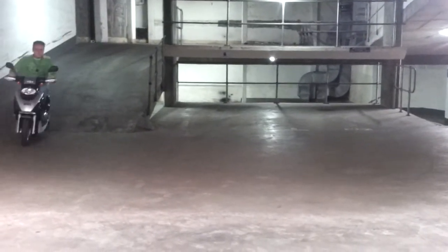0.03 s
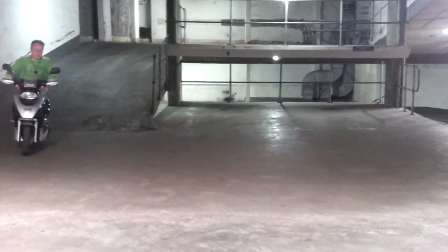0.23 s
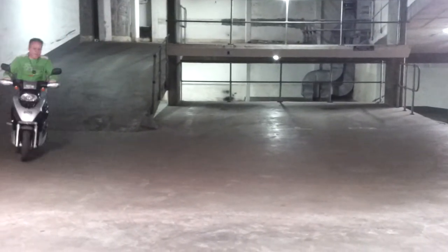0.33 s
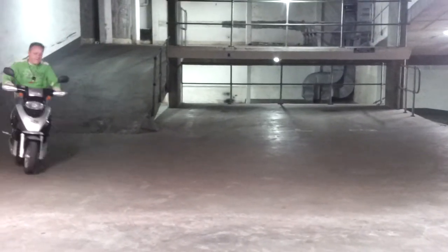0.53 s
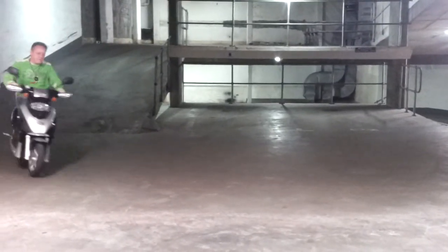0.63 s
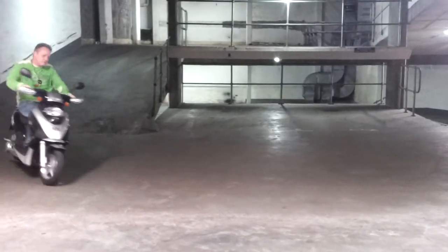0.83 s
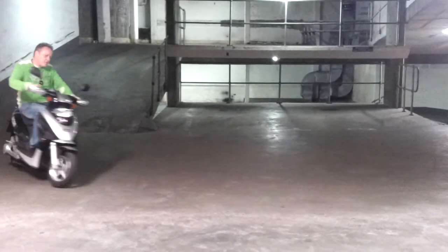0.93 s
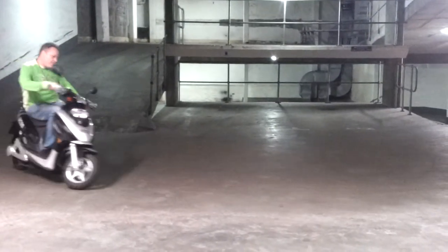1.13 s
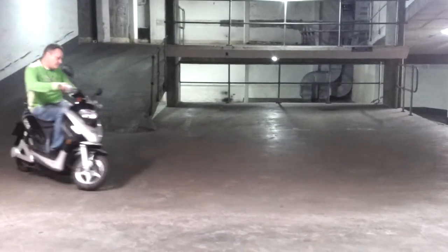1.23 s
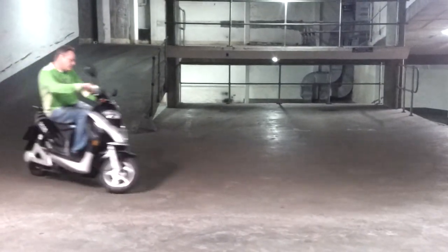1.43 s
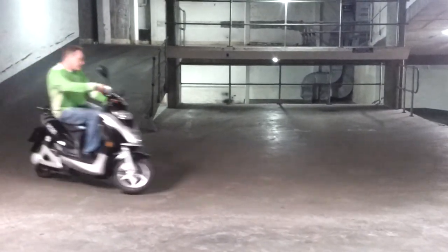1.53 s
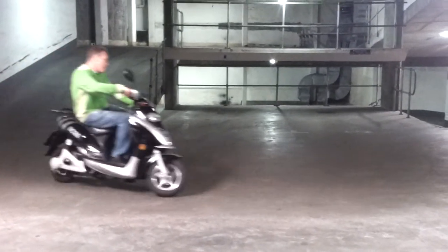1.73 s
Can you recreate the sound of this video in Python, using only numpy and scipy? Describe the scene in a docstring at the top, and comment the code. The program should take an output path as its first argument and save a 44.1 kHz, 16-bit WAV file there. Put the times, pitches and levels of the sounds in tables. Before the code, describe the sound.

A scooter tyre squeals on smooth concrete, a shrill wavering tone over a rubbing hiss. It stops and rings on in an indoor parking garage, leaving low wheel rumble and a faint drive whine.

```python
"""Scooter tyre squeal in a garage

A scooter turns on the smooth concrete of a parking garage. A tyre sticks and slips about 2100 times a
second: a shrill squeal that sags, turns rough and rises again over a rubbing hiss, then rings on in the
hall. Underneath, the drive whines faintly and the wheels rumble. A limiter holds the peaks down."""
import sys
import numpy as np
from scipy import signal
from scipy.fft import rfft, irfft, next_fast_len
from scipy.io import wavfile
from scipy.ndimage import uniform_filter1d, minimum_filter1d, map_coordinates

SR = 44100
rng = np.random.default_rng(int(sys.argv[2]) if len(sys.argv) > 2 else 0)


def unload_audio(sound):
    """Save the sound as a 16-bit wav file, at the path given as the first command line argument."""
    columns = np.transpose(np.atleast_2d(sound))
    # keep every value between -1 and 1, then stretch to whole-number steps
    steps = np.round(np.clip(columns, -1, 1) * 32767)
    wavfile.write(sys.argv[1], SR, steps.astype(np.int16))


N = 79380
TIME = np.arange(N) / SR


def amp(db):
    """Decibels to gain."""
    return 10 ** (np.asarray(db) / 20)


def unit(x):
    """Scale to rms 1."""
    return x / np.sqrt(np.mean(x ** 2) + 1e-20)


def along(points, hz):
    """Read (Hz, value) points along a log frequency axis."""
    freqs, values = np.transpose(points)
    return np.interp(np.log(hz + 1), np.log(freqs + 1), values)


def curves(rows):
    """One automation curve for each column after the time."""
    times, *columns = np.transpose(rows)
    return [np.interp(TIME, times, column) for column in columns]


def wobble(rate):
    """A smooth random curve, rate knots a second."""
    return map_coordinates(rng.standard_normal(4096), [TIME * rate], mode="mirror")


def filtered(x, response):
    """Equalise x with a gain given as a function of Hz."""
    size = next_fast_len(N + SR // 2)
    return irfft(rfft(x, size) * response(np.fft.rfftfreq(size, 1 / SR)), size)[:N]


def noise(colour):
    """Noise of rms 1, shaped by an EQ curve."""
    return unit(filtered(rng.standard_normal(N), lambda hz: amp(along(colour, hz))))


def phase_of(hz):
    """Running phase of a pitch curve."""
    return 2 * np.pi * np.cumsum(hz) / SR


def swelling_tones(rows):
    """Unsteady tones that each swell to a peak and fade."""
    tones = np.zeros(N)
    for peak_s, length_s, hz, db, scatter in rows:
        swell = np.exp(-4 * np.abs(TIME - peak_s) / length_s)
        pitch = hz * (1 + scatter * wobble(200))
        tones += amp(db) * swell * unit(np.sin(phase_of(pitch)))
    return tones


# The gesture of the squeal. Each row: time in seconds, pitch in Hz, level in dB, roughness from 0 to 1.
SQUEAL_PATH = [(.2, 2325, -90, 0.45), (.218, 2323, -33, 0.65), (.232, 2157, -14.5, 0.6),
               (.3, 2128, -14.5, 0.3), (.355, 2053, -17.5, 0.6), (.44, 2058, -13.5, 0.4),
               (.52, 2100, -11, .8), (.61, 2063, -15.5, 0.83), (.7, 2079, -13, 0.87),
               (.755, 2115, -14, 0.57), (.775, 2129, -15, 0.46), (.85, 2149, -12.5, 0.44),
               (.9, 2162, -11.5, 0.26), (.96, 2167, -12.5, .3), (1.04, 2217, -18, 0.42),
               (1.185, 2185, -23, 0.28), (1.255, 2180, -60, 0.2), (1.31, 2175, -24, .2),
               (1.37, 2162, -75, .2)]
# Its changing timbre. Each row: time in seconds, then the gains of harmonics 1 to 5 in dB.
SQUEAL_HARMONICS = [(.26, -1.5, 2.5, -9, -16, -25.5), (.44, 0.5, -4, -0.5, -15, -18.5),
                    (.54, -1.5, -0.5, -20.5, -8, -14), (.78, 0.5, -5.5, -5, -15.5, -17),
                    (1.05, 0.5, -3, -12, -21.5, -38)]


def squeal():
    """Stick-slip of the tread: a harmonic tone whose cycles scatter and snag more as the slip roughens."""
    rasp_db, rasp_width_hz, flutter_db = -10, 220, 3
    pitch, level_db, rough = curves(SQUEAL_PATH)
    snags = .07 * rough ** 2 * np.maximum(wobble(170) - 1, 0)  # pitch dips where the rubber sticks longer
    jitter = .012 * rough * wobble(380)
    waver = .009 * wobble(55)
    phase = phase_of(pitch * (1 + jitter + waver - snags))
    tone = np.zeros(N)
    for k, harmonic_db in enumerate(curves(SQUEAL_HARMONICS), 1):
        skirt = wobble(2 * rasp_width_hz) + 1j * wobble(2 * rasp_width_hz)  # noise around the harmonic
        rasp = amp(rasp_db) * rough * skirt
        tone += amp(harmonic_db) * np.real((np.sqrt(2) + rasp) * np.exp(1j * k * phase))
    return tone * amp(level_db + flutter_db * wobble(50))


# The fader ride of the rubbing hiss. Each row: time in seconds, level in dB.
SCRUB_LEVEL = [(0, -36.5), (.2, -34.5), (.3, -26.5), (.55, -21), (.85, -25.5), (1.06, -24), (1.17, -65),
               (1.8, -59)]
# Its bright EQ. Each row: frequency in Hz, gain in dB.
SCRUB_EQ = [(300, -31), (1300, -7), (1900, 2.5), (3100, -4.5), (4200, 2.5), (5300, 3.5), (7000, 7),
            (8200, 2), (9500, -2), (11300, -7), (12200, -29.5)]


def scrub():
    """Rubber rubbing over concrete: an uneven hiss."""
    level_db, = curves(SCRUB_LEVEL)
    return noise(SCRUB_EQ) * amp(level_db + 2.0 * wobble(60.1))


# Accents around the squeal. Each row: peak time in seconds, length in seconds, pitch in Hz,
# peak level in dB, scatter as a fraction of the pitch.
TYRE_CHIRPS = [(0.096, 0.2, 1880, -33, 0.047), (.23, 0.097, 9072, -21.5, 0.006),
               (.52, 0.26, 1828, -25, 0.05746)]


def tyre_chirps():
    """Brief side tones of the slipping tyre."""
    return swelling_tones(TYRE_CHIRPS)


# The voice of the drive. Each row: peak time in seconds, length in seconds, pitch in Hz,
# peak level in dB, scatter as a fraction of the pitch.
DRIVE_WHINES = [(1.452, 0.23, 835, -35.5, 0.0382), (1.15, 2, 365, -41, 0.069)]


def drive_whine():
    """Faint whines of the drive, swelling and fading."""
    return swelling_tones(DRIVE_WHINES)


# The nearly steady bed of rolling noise. Each row: time in seconds, level in dB.
ROLL_LEVEL = [(0, -30.5), (.13, -29.5), (.6, -29.5), (1.15, -31), (1.33, -29), (1.48, -29), (1.8, -32)]
# Its warm EQ. Each row: frequency in Hz, gain in dB.
ROLL_EQ = [(25, -7), (60, -2), (110, -2), (170, 1.5), (270, -0.5), (360, 0.5), (470, -2.5), (680, -7),
           (860, -5.5), (1300, -11.5), (3000, -19), (6000, -18.5), (9000, -25.5), (12000, -94)]
# The swell of the deep rumble. Each row: time in seconds, level in dB.
RUMBLE_LEVEL = [(0, -55), (.4, -35), (.52, -26.5), (.67, -29), (.75, -40), (.83, -32), (.99, -38.5),
                (1.2, -52), (1.8, -65)]
# Its bass-heavy EQ. Each row: frequency in Hz, gain in dB.
RUMBLE_EQ = [(12, -5), (25, -6), (31, -13), (42, 0), (80, 1.5), (130, -8.5), (300, -41), (1000, -90)]


def wheels():
    """Wheels on concrete: a diffuse rolling noise, and a rumble that swells as they come closer."""
    roll_db, = curves(ROLL_LEVEL)
    rumble_db, = curves(RUMBLE_LEVEL)
    roll = amp(roll_db + 0.2 * wobble(14)) * noise(ROLL_EQ)
    rumble = amp(rumble_db) * noise(RUMBLE_EQ)
    return roll + rumble


def hall_hum(hz=72, level_db=-44.5):
    """A low, slightly wavering hum in the hall."""
    pitch = hz * (1 + 0.021 * wobble(12.6))
    return amp(level_db) * unit(np.sin(phase_of(pitch)))


# The reverb of the garage. Each row: frequency in Hz, time to decay by 60 dB in seconds.
GARAGE_DECAY = [(200, 5), (2100, 2.36), (4200, 1.77), (6400, 1.45), (8500, 0.84), (12000, 0.71)]


def garage(x, direct_db=-4.5, early_db=-4, tail_db=-4, early_t60_s=.22):
    """Direct sound, quick echoes from floor and ceiling, and a long tail that loses its treble first."""
    hz, seconds, bands = signal.stft(rng.standard_normal(2 * SR), SR, nperseg=256)
    t60 = along(GARAGE_DECAY, hz)[:, None]
    tail = signal.istft(bands * amp(-60 * seconds / t60), SR, nperseg=256)[1][:N]
    early = rng.standard_normal(N) * amp(-60 * TIME / early_t60_s)
    echoes = amp(tail_db) * tail / np.linalg.norm(tail) + amp(early_db) * early / np.linalg.norm(early)
    return amp(direct_db) * x + signal.fftconvolve(x, echoes)[:N]


def scene():
    """Tyre and drive through the garage reverb, over a bed of hum and wheel noise, in mono."""
    scooter = squeal() + scrub() + tyre_chirps() + drive_whine()
    return (garage(scooter) + hall_hum() + wheels())[None]


def record(dry, ceiling=.74, lookahead_s=.0015, release_db_per_s=141, top_hz=15900):
    """A fast limiter holds the peaks down, then a steep low-pass trims the top."""
    x, lookahead = dry[0], int(lookahead_s * SR)
    needed_db = 20 * np.log10(np.minimum(1, ceiling / (np.abs(x) + 1e-9)))
    held_db = minimum_filter1d(needed_db, 2 * lookahead)
    recovery_db = release_db_per_s * TIME
    gain_db = np.minimum.accumulate(held_db - recovery_db) + recovery_db
    limited = x * amp(uniform_filter1d(gain_db, lookahead))
    return filtered(limited, lambda hz: hz < top_hz)[None]


dry = scene()
out = record(dry)
unload_audio(out)
```